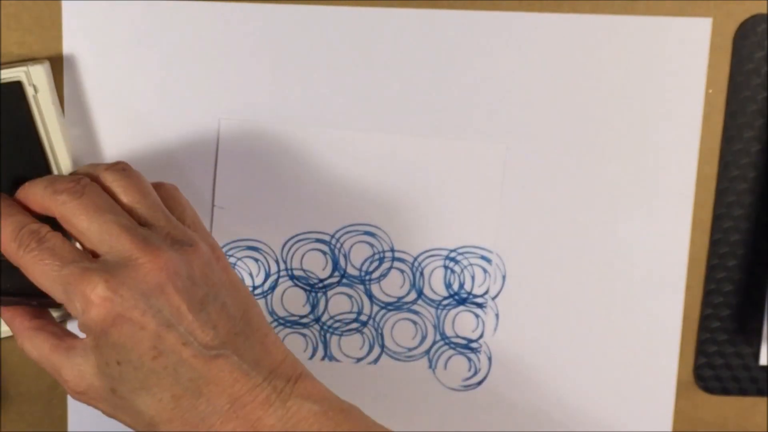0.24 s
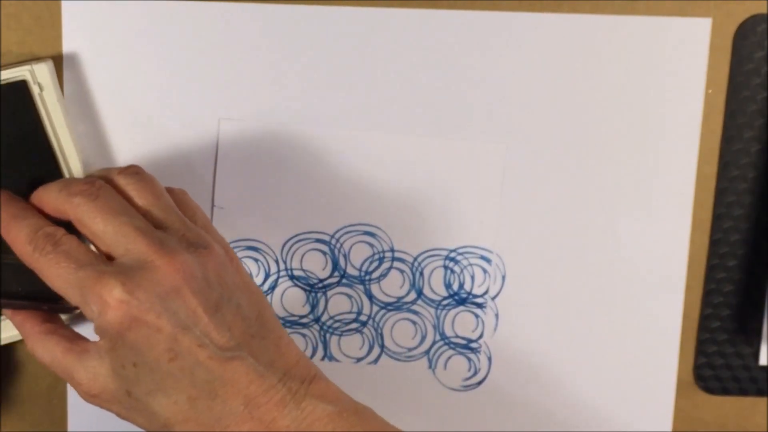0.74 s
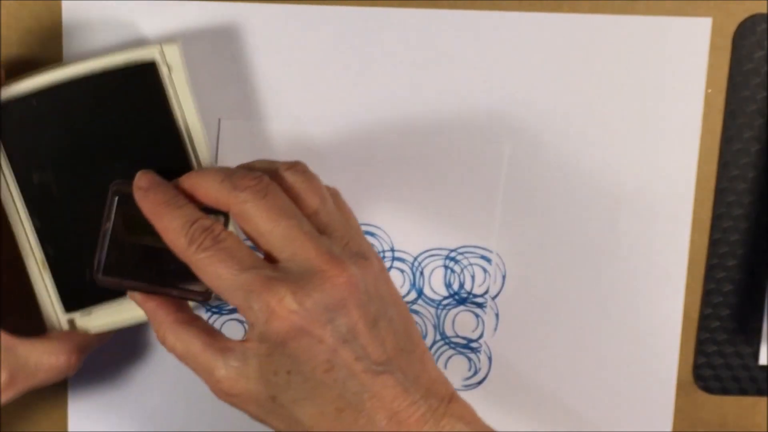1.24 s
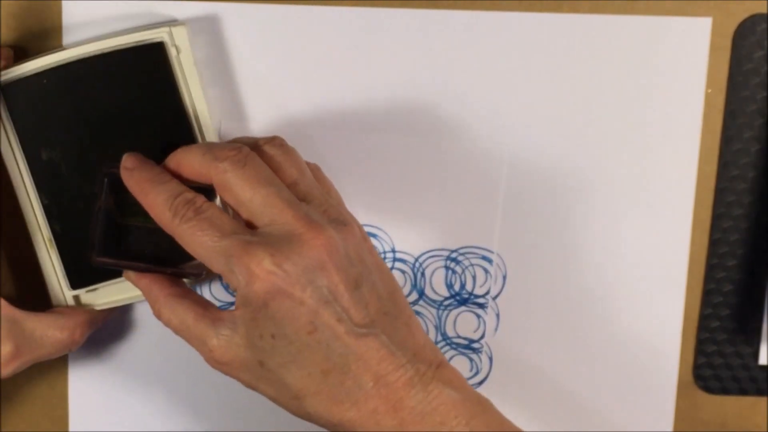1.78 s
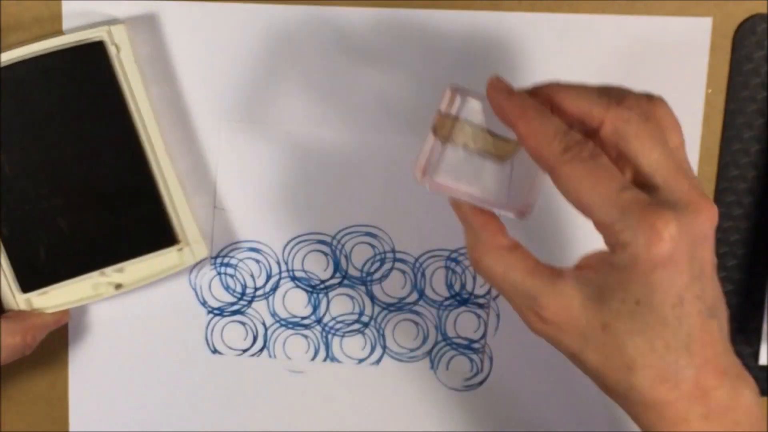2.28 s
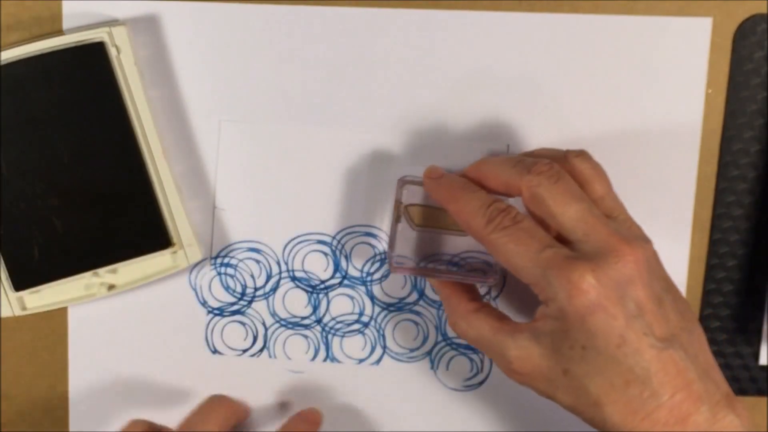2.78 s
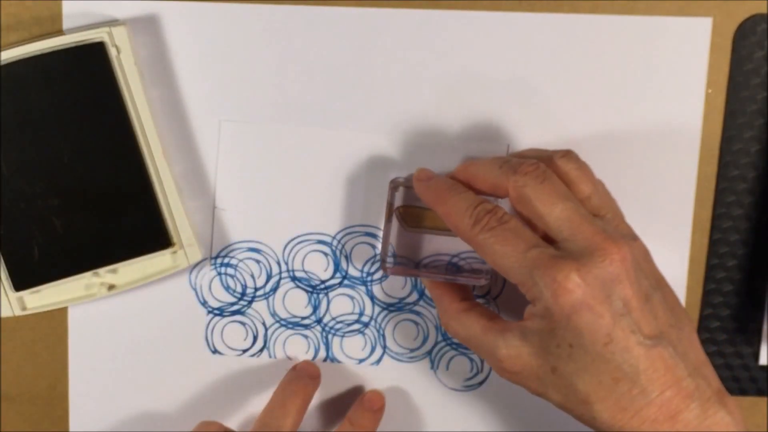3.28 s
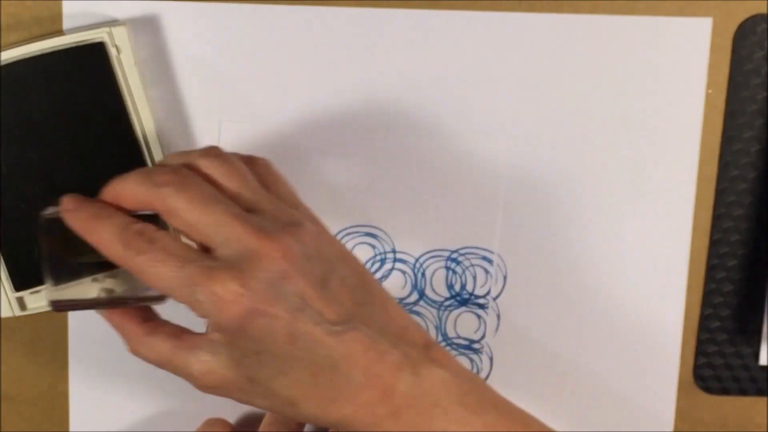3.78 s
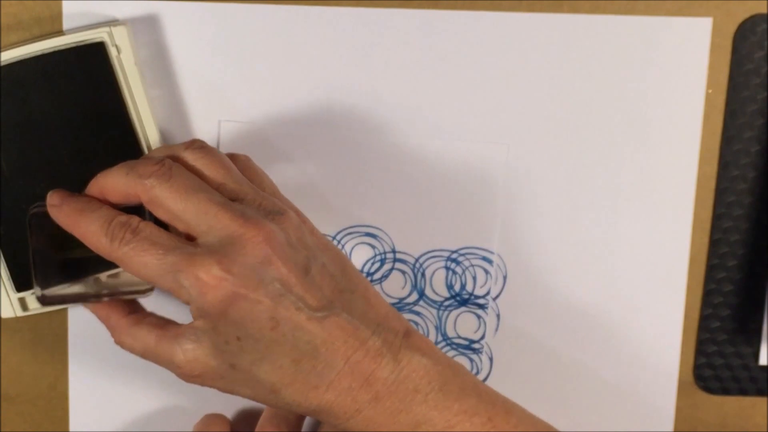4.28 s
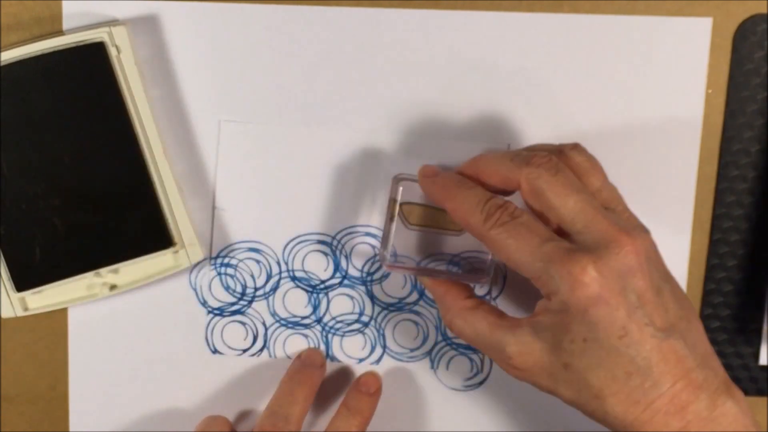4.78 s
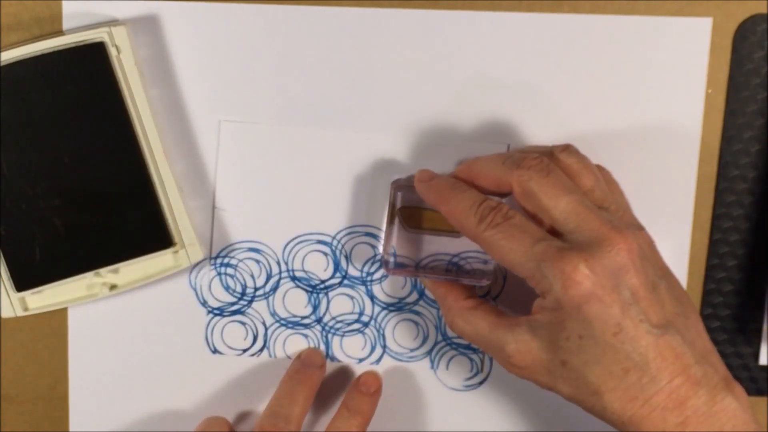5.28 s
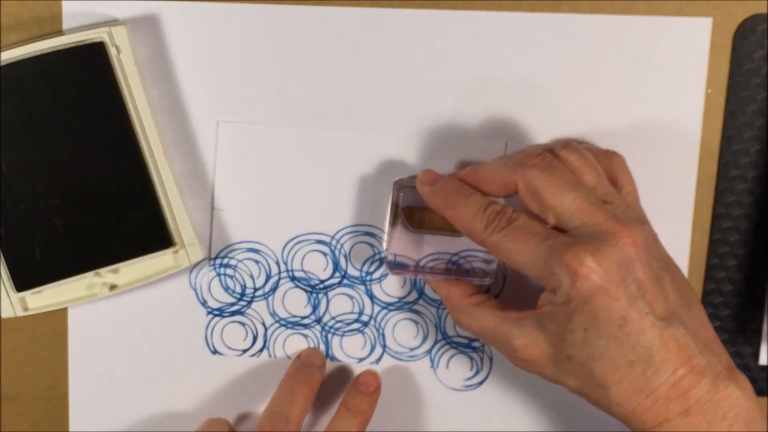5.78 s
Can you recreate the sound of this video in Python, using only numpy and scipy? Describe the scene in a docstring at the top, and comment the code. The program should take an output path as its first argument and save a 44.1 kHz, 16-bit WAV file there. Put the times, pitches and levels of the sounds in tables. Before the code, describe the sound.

A low hum and faint hiss fill a small room throughout. After a faint brush, a clear plastic stamp block taps on an ink pad five times, from about 0.3 to 1 second. Each tap is a light, close knock that rings the plastic case, with a small thud from the desk. The case rocks faintly between taps, and the tacky ink gives tiny bright snaps. A second, slightly stronger run of four taps comes from about 1.6 to 2 seconds. At about 2.4 seconds the block is set on paper with one more tap and a small click. Then only the hum remains until about 4.1 seconds, when the block presses once with a soft, dull thud. At about 4.4 seconds it lifts with a faint sticky tick and a brief brush, leaving the room's hum.

```python
"""A small room with a low hum and faint hiss, where a clear acrylic stamp block is tapped on an ink pad.
Two quick runs of taps, the block then set on paper; later one soft press on the pad and a sticky lift.
Each blow is a softened impulse that rings the block, the plastic case, its tray and the desk in turn.
Rocking of the case is made of short knocks, sticky ink of bright snaps, and brushing of dense tiny catches."""
import sys
import numpy as np
from scipy import signal
from scipy.fft import rfft, irfft
from scipy.io import wavfile

SR = 44100
rng = np.random.default_rng(int(sys.argv[2]) if len(sys.argv) > 2 else 0)


def generate_wav(sig):
    """Save sig (samples, or channels by samples) to the path in sys.argv[1] as 16-bit PCM at SR."""
    pcm = np.round(np.clip(np.atleast_2d(sig).T, -1, 1) * 32767).astype(np.int16)
    wavfile.write(sys.argv[1], SR, pcm)


N = 266143   # length in samples

# Low hum in the room. Each row: frequency in Hz, level in dB rms.
HUM_LINES = [(57.9, -57), (115.8, -81.5), (173.7, -85)]
# Colour of the hiss. Each row: frequency in Hz, relative spectral level in dB per Hz.
AIR_COLOUR = [(15, -65), (25, -17), (29, -22), (38, 2), (61, 2.5), (73, -2.5), (86, -27), (119, -14.5),
              (144, -26), (173, -22), (198, -27.5), (322, -29), (537, -33.5), (3260, -37.5), (15500, -47)]
AIR_DB = -72   # rms of the hiss above 356 Hz
# Reverb of the room. Each row: frequency in Hz, decay time t60 in s, tail in dB against the direct sound.
ROOM_BANDS = [(148, 0.33, -8), (280, 0.24, -13), (423, 0.2, -1.5), (1110, 0.23, -9), (2720, 0.17, -3.5),
              (7000, 0.13, -4.5), (13850, 0.12, -6)]

# Walls of the plastic case. Each row: frequency in Hz, width in Hz, gain in dB, dB gained per unit of place.
CASE_MODES = [(925, 34, 10, -9), (1044, 51, 7.5, 5.5), (1147, 24, -2, 13), (1188, 50, 4, 11.5),
              (1190, 60.4, -0.5, 5.5), (1458, 64, 3, 7.5), (1573, 136, -1.5, -11), (1760, 75, -10.5, 19.5),
              (1840, 53, -21, 4), (2157, 78, -5, 7.5), (2413, 46, 7.5, 4.5), (2584, 120, 0, -1),
              (2793, 105, -2, -3), (3287, 270, 1, 5), (3690, 110, -5.5, -15), (4130, 230, -9.5, -5)]
# Shallow tray under the felt. Each row: frequency in Hz, width in Hz, gain in dB.
TRAY_MODES = [(369, 10.5, 5.5), (386.4, 35, 10.5), (470, 66, -5), (555, 41, 0.5), (623, 38, -1),
              (723, 44, -0.5)]
# Desk top. Each row: frequency in Hz, width in Hz, gain in dB.
DESK_MODES = [(104, 12, 2), (142, 23, 7), (195, 24, 5), (222, 8, -3.5), (236.3, 9.1, -3.5), (282, 8.2, 3)]
# Dip in the microphone's treble. Each row: frequency in Hz, width in Hz, dB of the part lost.
MIC_DIP = [(10530, 330, -2)]
CUTOFF_HZ = 15750   # top of the microphone's range

# The block brushes over pad or paper. Each row: middle in seconds, half length in seconds,
# level in the case in dB, level of the rasp in dB.
BRUSHES = [(0.176, 0.13, -71.5, -76.5), (0.994, .03, -67.5, -70.5), (1.58, 0.025, -66, -71.5),
           (2.224, 0.015, -67, -78), (2.454, 0.03, -71, -73), (4.427, 0.012, -61, -71)]
# Tacky ink lets go. Each row: start in seconds, strength in dB, pitch in Hz.
INK_TICKS = [(1.024, -15.5, 7960), (1.5639, -21.5, 4830), (1.569, -35.5, 8500), (1.608, -15.5, 4940),
             (2.3872, -24, 6660), (2.4562, -30.5, 6950), (4.426, -34.5, 8240)]
# The case rocks on the desk as it is pressed or let go. Each row: landing in seconds, peak in dB, pitch in Hz.
ROCKS = [(0.413, -48.5, 1160), (0.573, -46, 1150), (0.614, -48, 1100), (0.743, -42, 1040),
         (0.916, -38.5, 1175), (1.075, -50, 1150), (1.667, -49, 1110), (1.813, -41, 1170),
         (1.839, -43, 1040), (1.955, -42.5, 1200), (2.117, -42, 1140), (4.053, -56, 1080),
         (4.435, -50, 1150)]
# Blows of the block. Each row: knock in seconds, strength in dB, desk thud in dB,
# contact cut-off in Hz (low is soft), place on the pad from -1 to 1.
TAPS = [(0.3488, -3, -19, 1760, 0.54), (0.5212, 3.5, -1.5, 2320, -0.37), (0.6777, -1, -10.5, 2300, -0.29),
        (0.832, 1, 3, 3130, -0.73), (1.024, -2.5, -1.5, 2620, -0.59), (1.565, -18, -13, 3500, -0.13),
        (1.6042, 4, 4.5, 2560, -0.31), (1.756, 7.5, 3.5, 2040, 0.17), (1.8987, 1.5, 2, 1850, -0.41),
        (2.0327, 2.5, 3, 1860, -0.11), (2.395, 0.5, -10.5, 2530, 0.98), (2.456, -16.5, -15.5, 2890, 0.7),
        (4.0569, -5, 5.5, 360, 0.42), (4.4283, -15.5, -8, 1250, 0.73)]

CASE_DB, TRAY_DB = -8, -3.0   # case and tray against the strength of a blow
TRAY_FOLLOWS_THUD = 0.16   # a blow that pushes through to the desk also drives the tray harder
USUAL_CONTACT_HZ, SOFT_CONTACT_HZ = 2300, 1000   # usual contact; a soft press lies at or below the second
KNOCK_HZ, KNOCK_RISE = 1413, 0.096   # block pitch at the usual contact; octaves gained per octave of hardness
EDGE_HZ, EDGE_LAG_S = 3900, 0.0015   # pitch of the block's edge, and its delay after the knock
EDGE_DB = -29.5   # clack of the edge against the strength of the blow
REBOUND_S, REBOUND_DB = 0.015, -7   # the rocking case bounces once more


def from_db(db):
    """Decibels to gain."""
    return 10 ** (np.asarray(db) / 20)


def rms_one(x):
    """Scale to rms 1."""
    return x / np.sqrt(np.mean(x ** 2) + 1e-20)


def filtered(x, hz, kind, order=2):
    """Causal Butterworth filter."""
    safe_hz = np.clip(hz, 10, SR / 2 - 500)
    return signal.sosfilt(signal.butter(order, safe_hz, kind, fs=SR, output="sos"), x)


def at_hz(points, hz):
    """Read the columns of a table on a log-frequency axis."""
    known_hz, *columns = np.transpose(points)
    return [np.interp(np.log(hz), np.log(known_hz), column) for column in columns]


def ring(x, modes):
    """Parallel resonances, each with its given gain at its peak."""
    out = 0
    for hz, width, db in modes:
        r = np.exp(-np.pi * width / SR)   # pole radius: a wider mode dies sooner
        poles = [1, -2 * r * np.cos(2 * np.pi * hz / SR), r * r]
        out = out + from_db(db) * signal.lfilter([1, 0, -1], poles, x) * (1 - r * r) / 2
    return out


def blow(db, size=16384):
    """An impulse followed by time to ring."""
    return from_db(db) * signal.unit_impulse(size) + 1e-18


def add(track, s, sound):
    """Mix a sound in at a time in seconds."""
    i = round(s * SR)
    track[i:i + len(sound)] += sound[:len(track) - i]


def background(drone_hz=58.6, drone_width_hz=25, drone_db=-65.0):
    """Steady hum lines, a wavering drone around the lowest one, and even hiss."""
    t = np.arange(N) / SR
    hum = sum(from_db(db) * np.sqrt(2) * np.sin(2 * np.pi * (hz * t + rng.random())) for hz, db in HUM_LINES)

    boom = [(drone_hz, drone_width_hz, 0)]
    narrow_noise = ring(ring(rng.standard_normal(N + SR), boom), boom)
    drone = rms_one(narrow_noise[SR:])   # the first second lets the resonance settle

    colour_db, = at_hz(AIR_COLOUR, np.fft.rfftfreq(N, 1 / SR) + 1)   # + 1 keeps the logarithm finite
    air = irfft(rfft(rng.standard_normal(N)) * from_db(colour_db), N)
    air = filtered(air / np.std(filtered(air, 356, "high")), 75, "high")
    return hum + from_db(drone_db) * drone + from_db(AIR_DB) * air


def room(x, first_wall_s=0.00074, build_s=0.00034, size=14000):
    """The direct sound, then dense reflections that arrive within milliseconds and die band by band."""
    t = np.maximum(np.arange(size) / SR - first_wall_s, 0)
    edges = np.geomspace(80, 18000, 10)
    tail = 0
    for low, high in zip(edges, edges[1:]):
        t60, db = at_hz(ROOM_BANDS, np.sqrt(low * high))
        envelope = (1 - np.exp(-t / build_s)) * from_db(-60 * t / t60)
        echoes = filtered(rng.standard_normal(size) * envelope, [low, high], "band")
        band_share = np.sqrt(2 * (high - low) / SR / size)   # makes the tail level relative to the direct sound
        tail = tail + from_db(db) * rms_one(echoes) * band_share
    return x + signal.fftconvolve(x, tail)[:len(x)]


def case(force, place, scatter_db):
    """The place of a blow decides which modes of block and case it drives most, with some chance."""
    chance = scatter_db * rng.standard_normal(len(CASE_MODES))
    modes = [(hz, width, db + lean * place + luck)
             for (hz, width, db, lean), luck in zip(CASE_MODES, chance)]
    return ring(force, modes)


def knock(force, hz, width_hz):
    """A cluster of heavily damped modes: a narrow band that swells and dies within a few cycles."""
    return filtered(force, [hz - width_hz / 2, hz + width_hz / 2], "band", order=3)


def hardness(contact_hz):
    """Octaves by which a contact is harder than usual."""
    return np.log2(contact_hz / USUAL_CONTACT_HZ)


def brushes(grains_per_s=2500, rasp_hz=6200, rasp_width_hz=4000, low_hz=1250, high_hz=1750):
    """Sliding is a dense run of tiny catches that sound in the case and as a thin rasp."""
    t = np.arange(N) / SR
    catches = rng.standard_normal(N) * (rng.random(N) < grains_per_s / SR)
    body = rms_one(case(filtered(catches, [low_hz, high_hz], "band"), 0, scatter_db=9.5))
    rasp = rms_one(ring(catches, [(rasp_hz, rasp_width_hz, 0)]))
    out = np.zeros(N)
    for s, half, body_db, rasp_db in BRUSHES:
        swell = np.exp(-((t - s) / half) ** 2)
        out += swell * (from_db(body_db) * body + from_db(rasp_db) * rasp)
    return out


def edge_clacks():
    """The block's edge ticks with every blow but a soft press; rows as in the ink ticks."""
    return [(s + EDGE_LAG_S, db + EDGE_DB, EDGE_HZ)
            for s, db, _, contact_hz, _ in TAPS if contact_hz > SOFT_CONTACT_HZ]


def ticks(crackle_s=0.0014, crackle_db=-18.0, snap_db=-4.0, width_hz=1900, spread_db=-10.0,
          low_hz=2400, top_hz=13500):
    """Ink or edge: one snap and a millisecond of tiny slips, bright and broad with one short resonance."""
    out = np.zeros(N)
    for s, db, hz in INK_TICKS + edge_clacks():
        snap = blow(snap_db)
        slips = rng.standard_normal(len(snap)) * np.exp(-np.arange(len(snap)) / (crackle_s * SR))
        force = from_db(db) * (snap + from_db(crackle_db) * slips)
        resonance = ring(force, [(hz, width_hz, 0)])
        spread = filtered(force, low_hz, "high")
        add(out, s, resonance + from_db(spread_db) * spread)
    return filtered(out, top_hz, "low")


def rocks(width_hz=380, case_db=-14.0, tray_db=-9.0, second_foot_db=-9.0, soft_hz=1900,
          graze_db=-13.0, graze_s=0.00424):
    """The light case grazes the desk, lands on one foot, then on the other, and rebounds once."""
    out = np.zeros(N)
    for s, db, hz in ROCKS:
        force = filtered(filtered(blow(0), [hz / 2, hz * 2], "band"), soft_hz, "low")
        second_foot_s = rng.uniform(0.002, 0.005)
        contacts = [(-graze_s, graze_db), (0, 0), (second_foot_s, second_foot_db), (REBOUND_S, REBOUND_DB)]
        for lag_s, loss_db in contacts:
            landing = knock(force, hz, width_hz)
            landing = landing + from_db(case_db) * case(force, 0, scatter_db=4.0)
            landing = landing + from_db(tray_db) * ring(force, TRAY_MODES)
            add(out, s + lag_s, from_db(db + loss_db) * landing / np.abs(landing).max())
    return out


def taps(knock_width_hz=600, rubber_cut_hz=4500, touch_db=-14.0, touch_lead_s=0.0016,
         case_lag_s=0.0007, desk_cut_hz=450, desk_lag_s=0.0022, wall_echo_s=0.01641, wall_echo_db=-7.0):
    """The rubber touches, the finger-damped block knocks, then case, tray and desk are pushed in turn."""
    out = np.zeros(N)
    for s, db, thud_db, contact_hz, place in TAPS:
        case_db = db + CASE_DB
        tray_db = db + TRAY_DB + TRAY_FOLLOWS_THUD * (thud_db - db)
        knock_hz = KNOCK_HZ * 2 ** (KNOCK_RISE * hardness(contact_hz))
        force = filtered(filtered(blow(0), contact_hz, "low"), rubber_cut_hz, "low", order=4)

        sound = case(from_db(case_db + touch_db) * force, place, scatter_db=4.0)   # first light touch
        add(sound, touch_lead_s, knock(filtered(blow(db), contact_hz, "low"), knock_hz, knock_width_hz))
        add(sound, touch_lead_s + case_lag_s, case(from_db(case_db) * force, place, scatter_db=0.5))

        push = -filtered(force, desk_cut_hz, "low")   # the felt lets only the slow part through
        thud = ring(from_db(thud_db) * push, DESK_MODES)
        tray = ring(from_db(tray_db) * push, TRAY_MODES)
        desk_s = touch_lead_s + desk_lag_s
        add(sound, desk_s, tray + thud)
        add(sound, desk_s + wall_echo_s, from_db(wall_echo_db) * thud)   # a wall returns the thud

        # Hand and block have moved: each blow has its own reflections.
        add(out, s - touch_lead_s, room(sound))
    return out


def scene():
    """All contacts sound in the room, over its background."""
    small_contacts = rocks() + ticks() + brushes()
    return (taps() + room(small_contacts) + background())[None]


def record(dry):
    """The microphone has a dip in the treble; the top is cut steeply."""
    coloured = dry - ring(dry, MIC_DIP)
    return signal.sosfilt(signal.ellip(10, 0.1, 70, CUTOFF_HZ, fs=SR, output="sos"), coloured)


dry = scene()
out = record(dry)
generate_wav(out)
```